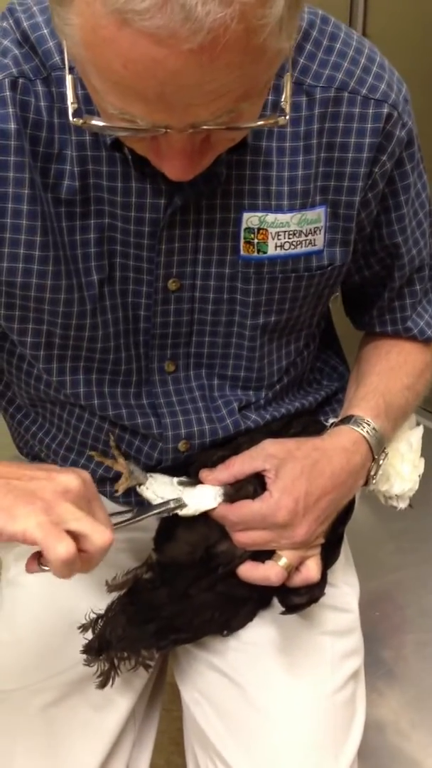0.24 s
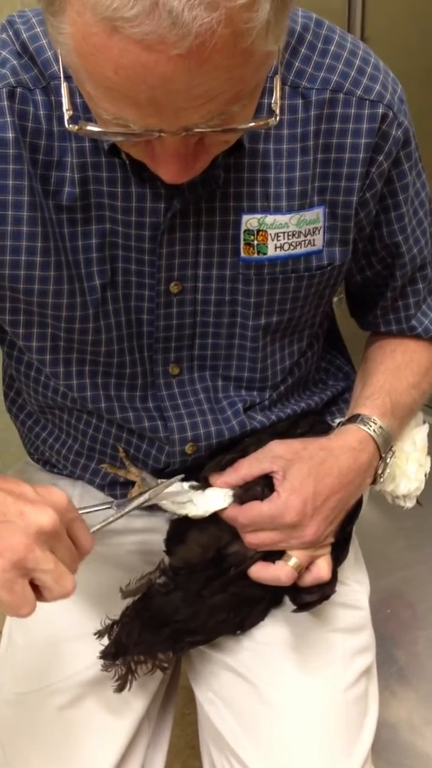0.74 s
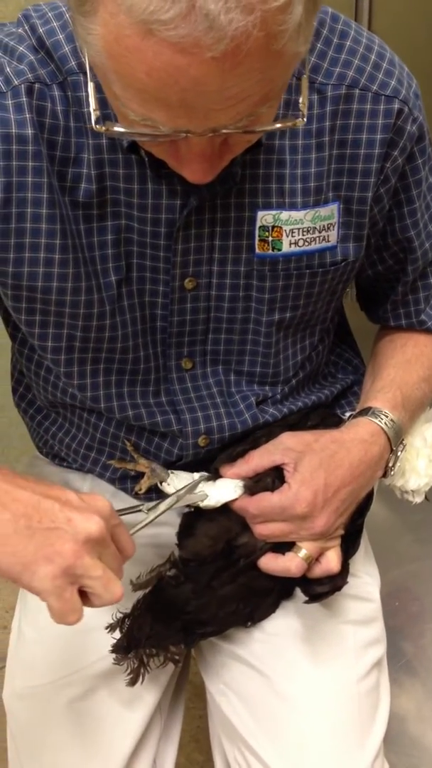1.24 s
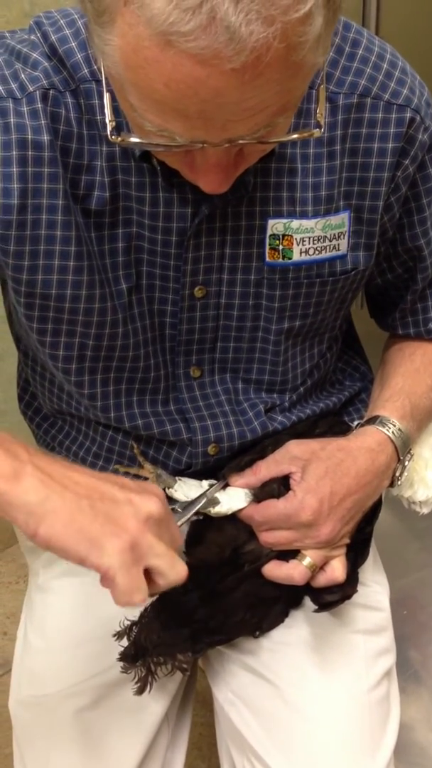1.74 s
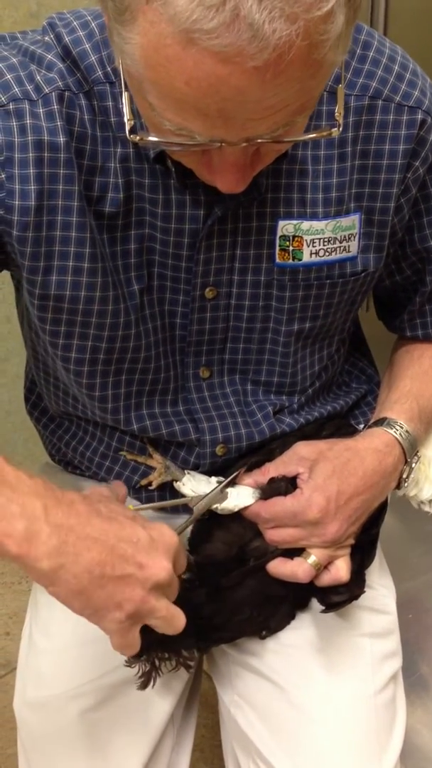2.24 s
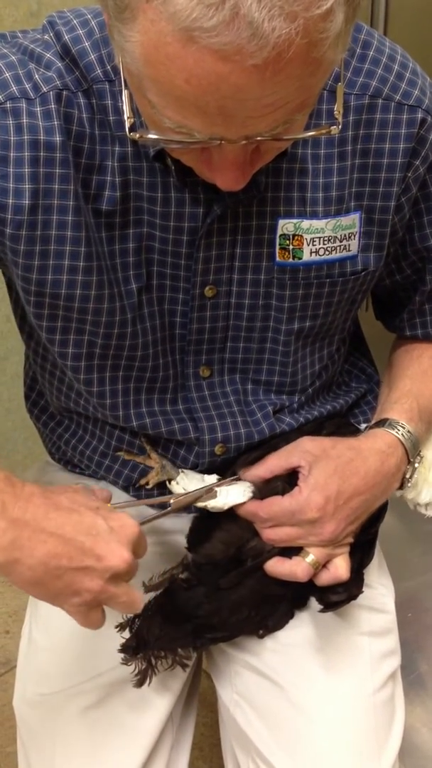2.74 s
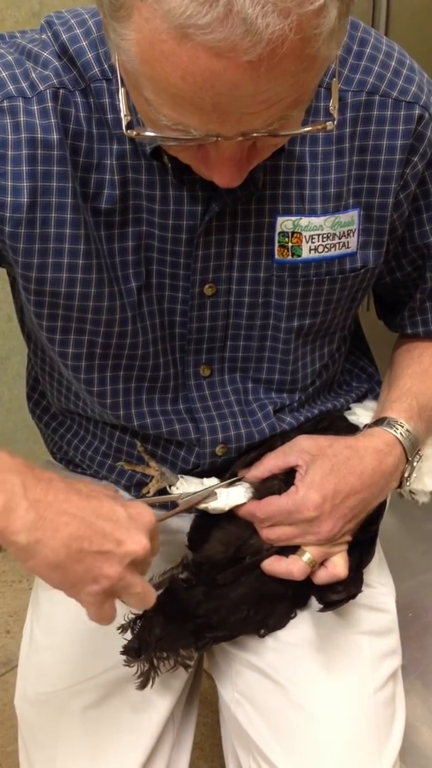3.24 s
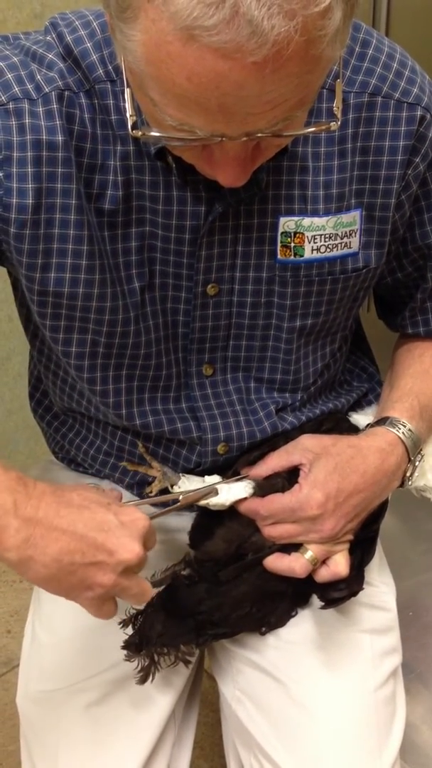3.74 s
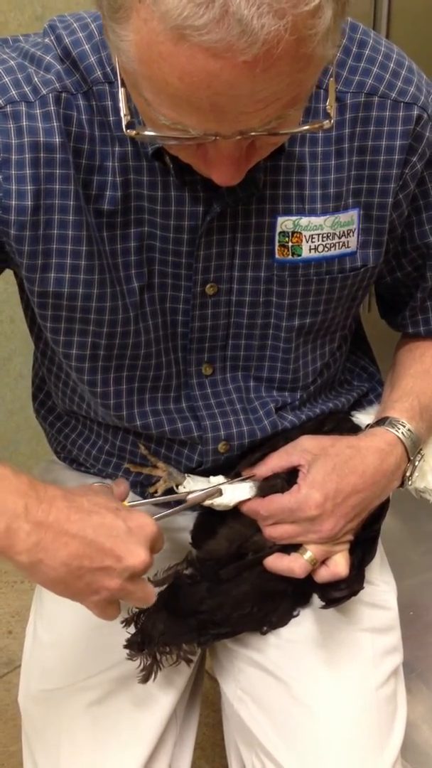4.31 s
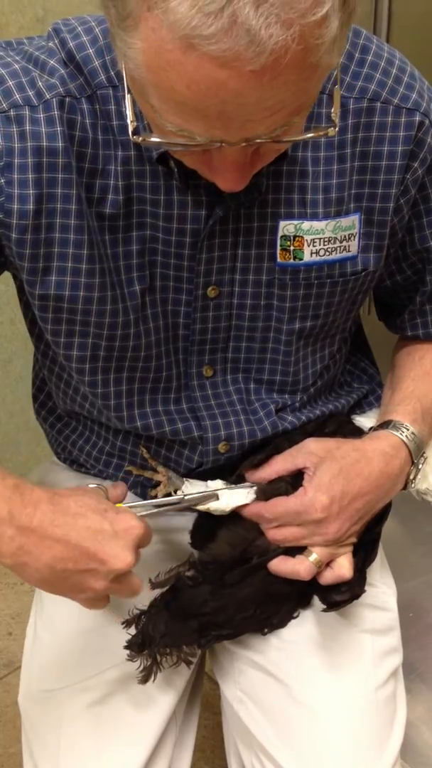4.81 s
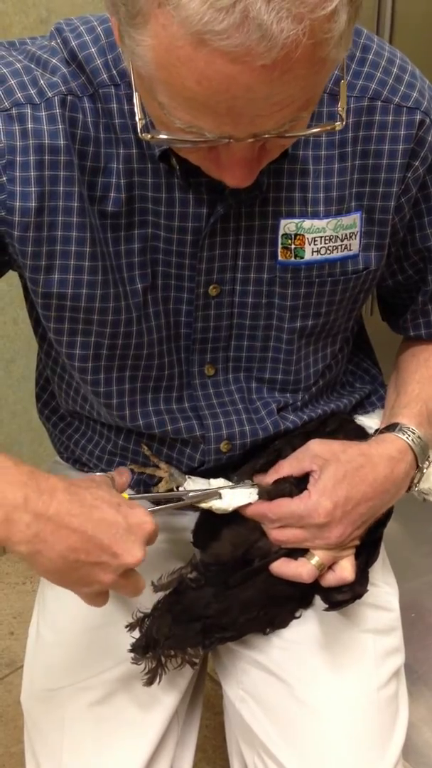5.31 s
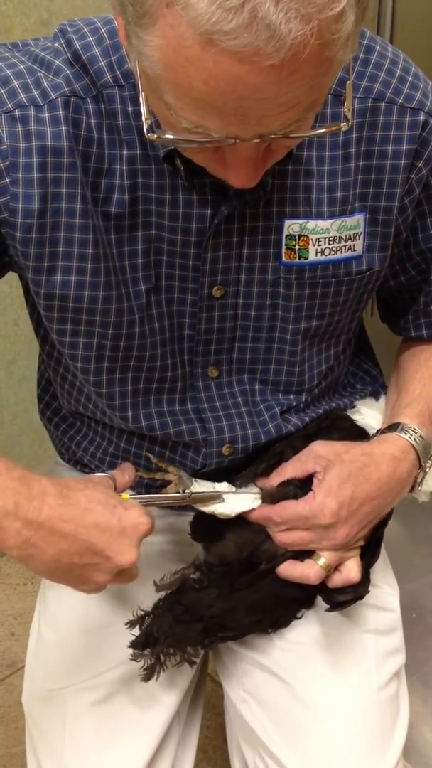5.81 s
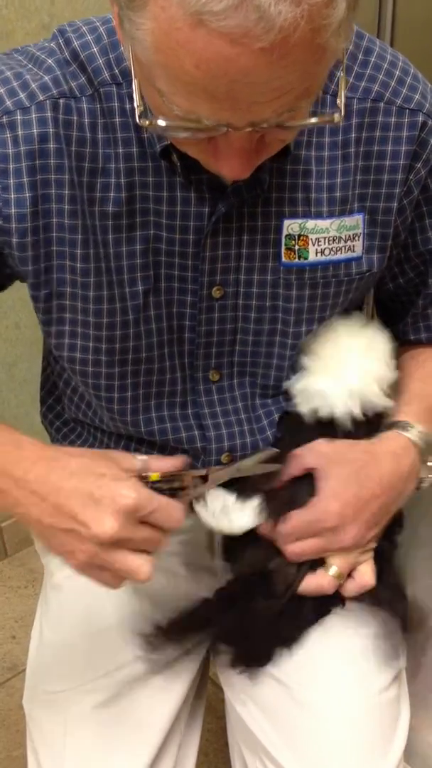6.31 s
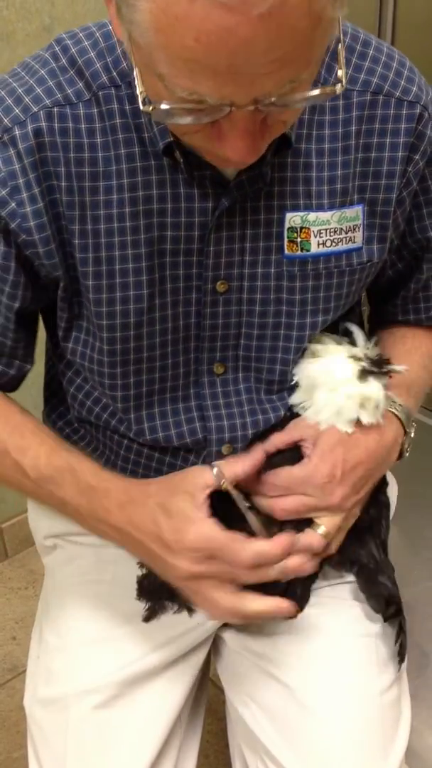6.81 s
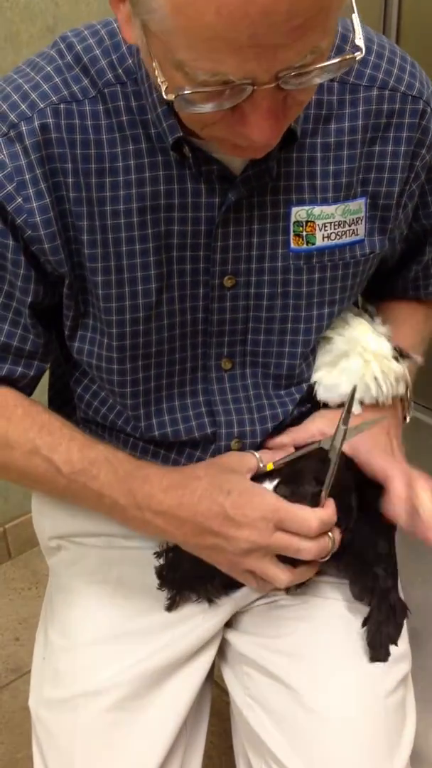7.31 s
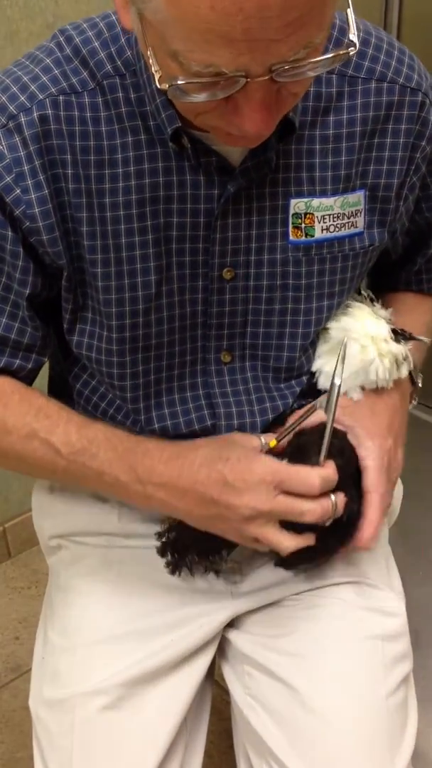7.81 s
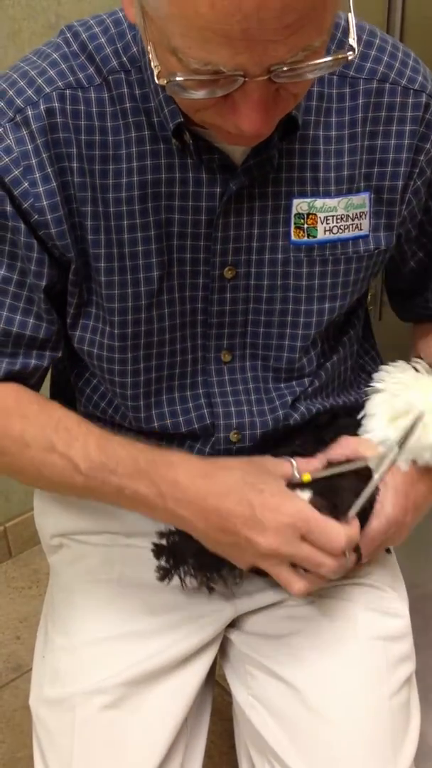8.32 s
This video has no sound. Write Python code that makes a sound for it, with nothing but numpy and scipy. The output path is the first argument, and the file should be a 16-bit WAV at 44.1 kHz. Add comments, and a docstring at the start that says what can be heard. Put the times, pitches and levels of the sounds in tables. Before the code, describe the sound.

A faint ventilation hum runs throughout in a small, hard-walled room that rings briefly. The sound opens on the tail of a nearby hen's squawk. Seven more follow, at about 0.6, 2, 2.9, 3.7, 4.5, 5.3 and 5.9 seconds, the later ones loudest. Each starts as a faint whine, swells into a wheezy hiss and breaks into a short, harsh cry that rises and falls with a shrill edge; most end in a low grunt. Scissors give light, bright ticks now and then, around 1.9, 4.8, 5.7, 6.6 and 7.2 seconds. From about 6.1 seconds feathers rustle softly, and the hen lets out a rough, rising growl, followed by a loud cluck at 6.6 seconds. A few quieter, hollow clucks come at around 6.8, 7.3 and 8.2 seconds as the rustle fades, ending at about 8.5 seconds.

```python
"""Ventilation hums in a small, hard-walled room where a hen, held on a lap, is having her feathers trimmed.
We come in on the end of a squawk, and seven more follow while the scissors tick now and then.
Each starts as a faint whine, swells into a wheezy hiss in her tight throat and breaks into a harsh,
arching cry from the syrinx; most run out of air in a low grunt. After six seconds feathers rustle
under the hands, she growls as she struggles, and she ends on a few hollow clucks."""
import sys
import numpy as np
from scipy import signal
from scipy.fft import rfft, irfft
from scipy.io import wavfile
from scipy.ndimage import uniform_filter1d

SR = 44100
rng = np.random.default_rng(int(sys.argv[2]) if len(sys.argv) > 2 else 0)


def persist_wave(psi):
    """Save psi, clipped to +-1, as 16-bit WAV."""
    counts = np.round(np.clip(psi, -1, 1) * 32767).astype(np.int16)
    wavfile.write(sys.argv[1], SR, np.atleast_2d(counts).T)


N = 377083


def amp(db):
    """Decibels to gain."""
    return 10 ** (np.asarray(db) / 20)


def unit(x):
    """Scales to rms 1."""
    return x / np.sqrt(np.mean(x ** 2) + 1e-20)


def read(points, hz):
    """Reads a curve on a log-frequency axis."""
    f, value = np.transpose(points)
    return np.interp(np.log(hz + 1), np.log(f), value)


def controls(rows):
    """Joins timed breakpoints by straight lines: one curve a column, one value a sample."""
    s, *columns = np.transpose(rows)
    t = np.arange(s[0], s[-1], 1 / SR)
    return [np.interp(t, s, column) for column in columns]


def add(mix, s, sound):
    """Mixes a sound in at time s; it may begin before zero."""
    at = round(s * SR)
    sound, part = sound[max(-at, 0):], mix[max(at, 0):]
    part[:len(sound)] += sound[:len(part)]


def noise(spectrum, size):
    """Noise of rms about 1 with the given spectrum."""
    white = rng.standard_normal(max(size, SR))
    gain = amp(read(spectrum, np.fft.rfftfreq(len(white), 1 / SR)))
    return unit(irfft(rfft(white) * gain, len(white)))[:size]


def wander(hz, size):
    """Smooth random drift of rms about 1, rolled off above hz."""
    white = rng.standard_normal(max(size, SR) + SR)
    return unit(signal.sosfilt(signal.butter(2, hz, fs=SR, output="sos"), white))[SR:][:size]


def fade(size, edge_s=0.0086):
    """Soft ends: the airflow takes a moment to start and stop."""
    return signal.windows.tukey(size, min(1, 2 * edge_s * SR / size))


# The colour of the moving air. Each row: frequency in Hz, relative level in dB.
AIR_SPECTRUM = [(18, -88), (30, -23), (85, -26.5), (110, -17.5), (132, -7), (147, -9.5), (222, -8),
                (253, -8.5), (374, -12), (552, -20.5), (774, -20.5), (837, -19), (1480, -23.5),
                (3150, -31.5), (15000, -39.5)]
# The fan's hum. Each row: pitch in Hz, level in dB.
FAN_TONES = [(120, -69), (178, -71), (233, -64)]


def ventilation(air_db=-57, waver=0.36):
    """The bed: a steady rush of air with a few wavering fan tones."""
    t = np.arange(N) / SR
    hum = np.zeros(N)
    for hz, db in FAN_TONES:
        level = amp(db) * np.sqrt(2) * (1 + waver * wander(9.2, N))
        hum += level * np.sin(2 * np.pi * hz * t + 2 * wander(2.5, N))
    return amp(air_db) * noise(AIR_SPECTRUM, N) + hum


def throat(x, resonances, opening, tilt_db, base_db):
    """Resonances over a flat base, all tilted per octave, at even loudness; opening scales their pitch."""
    hz, t, spectrum = signal.stft(x, SR, nperseg=512, noverlap=384)
    hz = hz[:, None]
    opening, tilt_db, base_db = (np.interp(t * SR, np.arange(len(x)), curve * np.ones(len(x)))
                                 for curve in (opening, tilt_db, base_db))
    peaks = sum(amp(db) / (1 + (2 * (hz - f * opening) / width) ** 2) for f, width, db in resonances)
    tilt = amp(tilt_db * np.log2(np.clip(hz, 500, 5000) / 1500))
    gain = (amp(base_db) + peaks / 2) * tilt
    shaped = signal.istft(spectrum * gain, SR, nperseg=512, noverlap=384)[1][:len(x)]
    return shaped / np.sqrt(uniform_filter1d(shaped ** 2, size=700) + 1e-12)


# Throat and beak in grunts, growls and clucks. Each row: resonance in Hz, width in Hz, height in dB.
THROAT_RESONANCES = [(970, 306, 16.5), (2350, 370, 10.5), (3267, 430, 13), (4500, 580, -15.5),
                     (7600, 640, 6)]


def cry(db, hz, rough, bright_db, opening, tone, rasp, jitter, flutter_db, rasp_db,
        resonances=THROAT_RESONANCES, stagger=0):
    """The syrinx beats out harmonics; as it turns rough its pitch shakes and it chops the air into puffs."""
    size, rough = len(db), np.clip(rough, .02, .99)
    cycles = np.cumsum(hz * (1 + jitter * rough * wander(227, size))) / SR
    cycles += stagger * wander(220, size)  # each beat comes early or late by a share of a period
    harmonics = unit(sum(amp(read(tone, k * hz)) * np.cos(2 * np.pi * (k * cycles + rng.random()))
                         for k in range(1, 24)))
    puffs = unit(noise(rasp, size) * (3.5 + np.exp(-(cycles % 1) / 0.79)))
    drive = np.sqrt(1 - rough ** 2) * (1 - rough / 2) * harmonics + amp(rasp_db) * rough * puffs
    flutter = unit(amp(flutter_db * rough * wander(84, size)))  # the membranes catch and slip
    voice = amp(db) * flutter * fade(size) * throat(drive, resonances, opening, bright_db, base_db=0)
    low_cut = signal.butter(2, 260, "highpass", fs=SR, output="sos")  # a small beak radiates no bass
    return signal.sosfilt(low_cut, voice)


def effort(rise_s, fall_s):
    """One push of air: time from its peak, and the distance from it (0-1) while rising and falling."""
    t = np.arange(-rise_s, fall_s, 1 / SR)
    return t, np.clip(-t / rise_s, 0, 1), np.clip(t / fall_s, 0, 1)


# The squawk's harmonics and its breathy rasp. Each row: frequency in Hz, relative level in dB.
SQUAWK_TONE = [(400, 15.5), (600, 8.5), (710, 4.5), (1050, -6.5), (1350, 1.5), (2000, -0.5), (2800, -4.5),
               (4200, -9), (6000, -22), (12000, -23.5), (15000, -35)]
SQUAWK_RASP = [(150, -42), (380, -45), (540, 9.5), (780, -4), (1200, -7), (1650, -3.5), (2100, 1),
               (2900, 0), (3800, -5), (4700, -8.5), (6400, -20), (8000, -16), (10000, -25), (13000, -30),
               (15500, -52)]
# Throat and beak in full cry. Each row: resonance in Hz, width in Hz, height in dB.
SQUAWK_RESONANCES = [(1060, 354, 16.9), (2326, 410, 10.1), (4380, 490, 2), (7400, 400, 7.1)]
# The big protests. Each row: peak time, rise and fall in seconds, level in dB, top pitch in Hz,
# roughness from 0 to 1, brightness in dB per octave, beak opening as a factor on the resonances,
# shrill ring in Hz, its height in dB.
SQUAWKS = [ (-.03, .06, 0.077, -33.5, 625.7, 0.37, 0.5, 1.06, 3440, 6),
           (.637, .051, 0.037, -25.5, 579, 0.49, 2, 0.98, 3250, 12.5),
           (2.03, 0.057, 0.056, -21, 620, 0.58, 2.5, 1.01, 3150, 5.5),
           (2.886, .052, 0.048, -20.5, 622.8, 0.44, 4, 1.015, 3170, 9),
           (3.657, 0.05, 0.06, -19, 672, 0.18, 2.5, 1.074, 3760, 14),
           (4.522, .056, 0.059, -19, 659.4, 0.45, 3, 1.078, 3420, 6),
           (5.306, 0.066, 0.091, -19.5, 693.7, 0.07, 4, 1.06, 3750, 15),
           (5.922, 0.063, 0.07, -19.5, 702.7, 0.15, 3.5, 1.07, 3650, -2), ]


def squawk(rise_s, fall_s, db, top_hz, rough, bright_db, opening, ring_hz, ring_db):
    """Level and pitch arch with the effort; it starts hoarse, then breaks and dulls as the beak closes."""
    t, early, late = effort(rise_s, fall_s)
    level_db = db - 24.5 * (early ** 2.04 + late ** 1.63)
    arch = 1 - 0.26 * (1 - np.exp(-abs(t / 0.043) ** 2.805))
    pitch = top_hz * arch * (1 - 0.904 * t)  # sags as the air runs out
    rough = rough + (0.64 - rough) * early ** 1.42 + (0.12 - rough) * late ** 2
    bright_db = bright_db - 3 * late ** 0.46
    resonances = SQUAWK_RESONANCES + [(ring_hz / opening, 124, ring_db)]
    beak = opening * (1 - 0.049 * early ** 2 - 0.08 * late ** 2)
    return cry(level_db, pitch, rough, bright_db, beak, SQUAWK_TONE, SQUAWK_RASP, jitter=0.044,
               flutter_db=5.5, rasp_db=4.5, resonances=resonances, stagger=0.011 * (1 + 2 * late))


# How long the hard walls ring. Each row: frequency in Hz, seconds to fall by 60 dB.
ROOM_T60 = [(150, 0.59), (550, 0.8), (800, 0.9), (1130, 0.91), (1350, 0.77), (1700, 0.7), (2500, 0.52),
            (3450, 0.63), (4500, 0.6), (8000, 0.43), (14000, 0.29)]
# The colour of the reverb. Each row: frequency in Hz, relative level in dB.
ROOM_COLOUR = [(300, 1), (560, -2.5), (710, -0.5), (850, 0), (1130, 1.5), (1350, 3), (1700, 0), (2500, 1),
               (3450, 1), (6000, -0.5), (14000, -1)]


def room_tail(bass_build_s=0.0028, treble_build_s=0.013):
    """The dense reverb of the room; its treble builds up more slowly and dies first."""
    hz, t, spectrum = signal.stft(rng.choice([-1., 1.], SR), SR, nperseg=256)
    build_s = np.interp(hz, [1000, 3000], [bass_build_s, treble_build_s])[:, None]
    decay = amp(read(ROOM_COLOUR, hz)[:, None] - 60 * t / read(ROOM_T60, hz)[:, None])
    tail = signal.istft(spectrum * decay * (1 - np.exp(-t / build_s)), SR, nperseg=256)[1]
    return tail / np.linalg.norm(tail)


# Early reflections. Each row: delay in seconds, gain against the direct sound.
REFLECTIONS = [(.0015, 0.12), (.0046, 0.27), (.01, 0.7), (0.016, 0.24), (.068, 0.19)]


def room(x, tail, wet_db):
    """Direct sound, a few early reflections and the tail."""
    response = amp(wet_db) * tail
    response[0] += 1
    for delay_s, gain in REFLECTIONS:
        response[round(delay_s * SR)] += gain
    return signal.fftconvolve(x, response / np.linalg.norm(response[:SR // 25]))


# The breath behind whines and hisses. Each row: frequency in Hz, relative level in dB.
BREATH_SPECTRUM = [(200, -19), (500, -2.5), (900, -9.5), (1600, 0.5), (2600, 9), (4500, 0), (6300, -12),
                   (8200, -11), (11000, -21), (15000, -26)]
# The tight, wheezing throat. Each row: resonance in Hz, width in Hz, height in dB.
WHEEZE_RESONANCES = [(1026, 145, 29.8), (2540, 270, 9.2), (3630, 82, 2.8), (4860, 120, 0.92),
                     (8400, 200, 2)]
# Faint lead-ins to the hisses. Each row: start and length in seconds, level in dB, widest beak opening.
WHINES = [(.432, 0.049, -52.5, 0.86), (1.816, 0.043, -59, 0.9), (2.638, 0.059, -53.5, 0.89),
          (3.38, 0.087, -51.5, 0.95), (4.237, 0.11, -53.5, 0.98), (5.022, 0.038, -49, 0.85),
          (5.666, 0.043, -42, 0.79)]


def whine(length, db, opening, arch=0.18, crest=0.63, flutter_db=3):
    """A hoarse, airy note: the throat's resonances rise, then sink a little."""
    size = round(length * SR)
    progress = np.linspace(0, 1, size)
    opening = opening * (1 - arch * ((progress - crest) / crest) ** 2)
    air = throat(noise(BREATH_SPECTRUM, size), WHEEZE_RESONANCES, opening, tilt_db=-4, base_db=-6)
    return amp(db + flutter_db * wander(120, size)) * signal.windows.tukey(size, .6) * air


# The bright colour of steel blades. Each row: frequency in Hz, relative level in dB.
STEEL_SPECTRUM = [(500, -25), (2000, -38), (4000, -6), (6500, -2), (9000, 1), (12000, -4), (15500, 1.5)]
# Scissor ticks. Each row: start in seconds, level in dB.
SNIPS = [(.447, -58), (1.92, -50), (1.936, -49), (2.647, -66), (4.82, -48.5), (4.849, -55), (5.043, -52),
         (5.718, -46), (6.553, -44), (6.655, -49), (7.178, -39), (7.229, -49)]


def snip(db, decay_s=0.0048):
    """The blades close with a short, bright tick."""
    t = np.arange(SR // 20) / SR
    return amp(db) * noise(STEEL_SPECTRUM, len(t)) * np.exp(-t / decay_s)


# The snap of wet ticks and membrane claps. Each row: frequency in Hz, relative level in dB.
SNAP_SPECTRUM = [(1500, -41), (3300, 2), (5500, 3.5), (6700, -11), (8200, -3.5), (10000, -8), (13000, -9),
                 (15500, -17)]


def crackle(size, ticks_per_s=100, decay_s=0.001):
    """Sparse wet ticks in the tight airway."""
    ticks = (rng.random(size) < ticks_per_s / SR) * rng.uniform(0.33, 1, size)
    t = np.arange(SR // 200) / SR
    return signal.fftconvolve(ticks, noise(SNAP_SPECTRUM, len(t)) * np.exp(-t / decay_s))[:size]


# Swells into the squawks. Each row: start and length in seconds, level it swells toward in dB, broad
# rush beside the resonances in dB, final beak opening, first push in dB (below 0 it creeps in).
HISSES = [(0.494, 0.1, -50, 8, 0.86, 2), (1.901, 0.042, -44, 4, 0.87, 4.5),
          (1.935, 0.059, -50, -2, 1.6, -6), (2.641, 0.016, -49, -4, 0.87, 4.5),
          (2.701, 0.17, -34, 7, 0.89, -7), (3.469, 0.11, -48, 16, 1.25, 1),
          (3.553, 0.092, -31, 5, 0.99, 0.5), (4.365, 0.13, -31.5, 0.5, 0.97, 6),
          (5.028, 0.22, -32.5, -1, 0.96, -2), (5.68, 0.26, -27, -8.5, 1.03, -2)]


def hiss(length, db, breadth_db, opening, push_db, swell_db_per_s=86, rattle_db=4, rattle_hz=44):
    """Air forced through the tight throat rattles and whistles, louder and higher as the beak opens."""
    left_s = np.arange(length, 0, -1 / SR)
    size = len(left_s)
    push = np.exp((left_s - length) / 0.034)
    opening = opening - 0.24 * left_s + 0.029 * wander(26, size)  # the throat trembles as it opens
    rattle_cycles = np.cumsum(rattle_hz * (1 + 0.41 * wander(42, size))) / SR
    rattle = rattle_db * np.cos(2 * np.pi * rattle_cycles)
    rush_db = breadth_db + rattle - 4.5 * push  # starts narrow; the broad rush joins after the push
    air = throat(noise(BREATH_SPECTRUM, size), WHEEZE_RESONANCES, opening, tilt_db=0, base_db=rush_db)
    air += amp(-1) * crackle(size)
    swell_db = db - swell_db_per_s * left_s + push_db * push
    flutter_db = 0.17 * rattle + 2 * wander(360, size)
    return amp(swell_db + flutter_db) * fade(size, edge_s=0.0083) * air


# Thin gliding tones around the calls: airway whistles, and two brief wall echoes of a squawk's upper
# ring (3.70 s, 5.36 s). Each row: start and length in seconds, start pitch in Hz, level in dB.
THIN_TONES = [(0.536, 0.1, 3350, -48.5), (0.583, 0.068, 2356, -33.5), (0.616, 0.033, 3450, -31.5),
              (0.711, 0.046, 4330, -50), (.715, 0.054, 3440, -48.5), (1.901, 0.04, 2285, -40),
              (1.879, 0.045, 3230, -53.5), (1.94, 0.14, 3300, -43.5), (2.003, 0.014, 3310, -31.5),
              (2.709, 0.081, 2297, -44.5), (2.777, 0.084, 2282, -38.5), (2.781, 0.064, 3310, -50),
              (3.704, .034, 2650, -30), (4.502, 0.014, 3296, -25), (5.17, .1, 2570, -42),
              (5.362, 0.024, 2780, -29), (5.879, 0.0376, 2516, -30), (7.28, 0.027, 3890, -43.5),
              (7.283, 0.036, 4320, -48), (7.284, 0.075, 2508, -43.5), (7.375, 0.0087, 1183, -30.5),
              (8.136, 0.018, 1676, -49.5), (8.239, 0.034, 1659, -38), (8.243, 0.016, 2610, -39.5),
              (8.3, 0.018, 2550, -43.5)]
TONE_SAG_HZ_PER_S = 1190


def thin_tone(length, start_hz, end_hz, db, waver=0.022, flutter_db=3):
    """One unsteady, gliding line; waver is the share by which its pitch trembles."""
    size = round(max(length, .01) * SR)
    hz = np.linspace(start_hz, end_hz, size) * (1 + waver * wander(195, size))
    swell = signal.windows.tukey(size, .5) * amp(db + flutter_db * wander(204, size))
    return np.sqrt(2) * swell * np.sin(2 * np.pi * np.cumsum(hz) / SR)


# The windpipe's high modes. Each row: resonance in Hz, width in Hz, height in dB.
WINDPIPE_RESONANCES = [(5780, 220, 4.5), (6130, 280, 21), (7700, 300, 18.4), (8360, 280, 17),
                       (10660, 440, 12.3), (12200, 480, 9)]
# The piercing edge on the squawks. Each row: start and length in seconds, level in dB, beak opening.
CLAP_BURSTS = [(0.616, .033, -39, 0.96), (2.002, 0.04, -38.5, 1.09), (2.863, 0.032, -35, 0.97),
               (3.641, 0.06, -37.5, 1.05), (4.501, .034, -35, 1.01), (5.284, .056, -34, 1.04),
               (5.898, 0.027, -46, 1.04)]


def claps(length, db, opening, claps_per_s=300, uneven_db=5):
    """At full effort the membranes clap together at uneven moments and ring the windpipe."""
    size = round(length * SR)
    cycles = np.cumsum(claps_per_s * np.exp(.4 * wander(200, size))) / SR
    cracks = noise(SNAP_SPECTRUM, size) * np.exp(-(cycles % 1) / 0.27)
    cracks *= amp(uneven_db * wander(190, size))
    ringing = throat(cracks, WINDPIPE_RESONANCES, opening, tilt_db=0, base_db=0)
    return amp(db) * fade(size, edge_s=.005) * ringing


# The grunt's dark harmonics, and the rasp it shares with the clucks.
# Each row: frequency in Hz, relative level in dB.
GRUNT_TONE = [(300, 9), (520, 4.5), (800, -2.5), (1100, -2.5), (1700, -16.5), (2400, -66), (4500, -26),
              (12000, -43)]
SHORT_CALL_RASP = [(150, -34), (350, -58), (520, 3.5), (800, -11), (1300, -9), (1700, 0.5), (2500, -10.5),
                   (3200, -9), (4200, -9), (5500, -36), (9000, -30), (15000, -41)]
# The tail ends of squawks. Each row: peak time, rise and fall in seconds, level in dB, peak's pitch in Hz.
GRUNTS = [(0.696, .02, 0.038, -30, 545.8), (2.105, 0.015, 0.047, -31.5, 510), (2.14, .015, 0.12, -45, 359),
          (2.957, 0.029, 0.011, -29, 489.6), (3.735, 0.016, 0.17, -47.5, 352.5),
          (4.598, .022, 0.0114, -30.5, 545.6), (5.386, 0.03, 0.018, -27, 560.4)]


def grunt(rise_s, fall_s, db, hz, floor_hz=275, sag_s=0.0893):
    """The last of the air: a short low note whose pitch sinks."""
    t, early, late = effort(rise_s, fall_s)
    level_db = db - 16.5 * (early ** 2 + late)
    pitch = floor_hz + (hz - floor_hz) * np.exp(-t / sag_s)
    return cry(level_db, pitch, rough=0.26, bright_db=1, opening=0.9, tone=GRUNT_TONE,
               rasp=SHORT_CALL_RASP, jitter=0.13, flutter_db=9, rasp_db=-11.5)


# The squeak's first four harmonics, each a relative level in dB.
SQUEAK_PARTIALS_DB = [-8, -0.5, -6.5, -17]
# Squeaks inside the whines. Each row: start and length in seconds, level in dB, start and end pitch in Hz.
SQUEAKS = [(1.831, 0.029, -52, 920, 1083), (3.427, 0.04, -51.5, 1022, 1203),
           (4.281, 0.0395, -49, 999, 1168)]


def squeak(length, db, start_hz, end_hz):
    """The airway catches for a moment and sounds a thin, rising note."""
    return sum(thin_tone(length, k * start_hz, k * end_hz, db + partial_db, waver=0.005, flutter_db=1.5)
               for k, partial_db in enumerate(SQUEAK_PARTIALS_DB, 1))


# The soft colour of feathers and cloth. Each row: frequency in Hz, relative level in dB.
FEATHER_SPECTRUM = [(80, -28), (300, 16.5), (1000, 8), (3000, 10.5), (7000, 4), (10000, 2.5), (15000, -2)]
# The fader ride on the rustle. Each row: time in seconds, level in dB.
RUSTLE_CURVE = [(6.101, -65.5), (6.299, -50), (6.7, -62.5), (6.899, -67.5), (7.1, -66.5), (7.251, -61.5),
                (7.599, -70), (7.701, -54), (7.759, -78), (7.85, -68.5), (8.502, -78)]


def rustle(grain_db=5):
    """Feathers slide under the hands in small clumps of grains."""
    db, = controls(RUSTLE_CURVE)
    return amp(db) * unit(noise(FEATHER_SPECTRUM, len(db)) * amp(grain_db * wander(300, len(db))))


# The growl's harmonics and its rasp. Each row: frequency in Hz, relative level in dB.
GROWL_TONE = [(380, 4), (570, 7.5), (900, 3), (1150, 4.5), (1700, 3.5), (2300, -7), (3400, -17),
              (5200, -48), (12000, -46)]
GROWL_RASP = [(150, -35), (330, -80), (500, 8.5), (850, -0.5), (1300, -1.5), (1850, 3), (2400, -3),
              (3200, -11.5), (4300, -10), (5500, -30), (9000, -35), (15000, -52)]
# The struggle: a growl, then a loud cluck in the same voice. Each row: time in seconds, level in dB,
# pitch in Hz, roughness from 0 to 1, brightness in dB per octave.
GROWL_CURVE = [(6.198, -39.5, 387.6, 0.4, -10.5), (6.225, -31, 439, 0.34, -1.5), (6.245, -28, 504, 0.44, 2),
               (6.3, -28.5, 522.5, 0.64, 3), (6.352, -23.5, 564.6, 0.25, 6.5),
               (6.385, -24.5, 578.2, 0.26, 4.5), (6.42, -28, 607.6, 0.28, 1),
               (6.455, -29.5, 595.5, 0.23, 0.5), (6.48, -36, 563, 0.14, -4)]
LOUD_CLUCK_CURVE = [(6.533, -29.5, 484, 0.43, -7), (6.55, -27, 526.7, 0.28, -9),
                    (6.562, -29.5, 523.5, 0.48, -6), (6.579, -27, 547, 0.37, -6.5),
                    (6.6, -29.5, 517, 0.52, -7), (6.618, -36, 490, 0.63, -7)]


def growl(curve, opening):
    """A throaty note that breaks up and clears again as she strains."""
    db, hz, rough, bright_db = controls(curve)
    return cry(db, hz, rough, bright_db, opening, GROWL_TONE, GROWL_RASP,
               jitter=0.0866, flutter_db=2, rasp_db=9)


# The cluck's hollow harmonics. Each row: frequency in Hz, relative level in dB.
CLUCK_TONE = [(380, 10), (550, 4.5), (1100, -16.5), (1600, -4.5), (1950, -12), (2450, -24), (3200, -33),
              (4000, -19), (5200, -21.5), (9000, -17.5), (12000, -31)]
# The closing clucks. Each row: peak time, rise and fall in seconds, level in dB, pitch in Hz,
# glide in Hz per second, roughness from 0 to 1, brightness in dB per octave, beak opening.
CLUCKS = [ (6.818, 0.012, 0.0056, -34.5, 488, -15, 0.84, -5, 0.99),
          (6.853, 0.007, 0.0082, -32, 517, -1000, 0.86, -4.5, 1),
          (7.303, 0.027, 0.025, -30.5, 528.6, 2502, 0.4, 0, 0.81),
          (7.38, .02, 0.024, -28.5, 561.6, 901, 0.45, -0.5, 0.72),
          (7.428, 0.032, 0.036, -39, 599, -500, 0.8, -7, 1),
          (8.18, 0.041, 0.11, -44, 544, -100, 0.89, 1.5, 0.77),
          (8.25, 0.0087, 0.015, -32, 525, -1400, 0.36, -3, 0.95), ]


def cluck(rise_s, fall_s, db, hz, glide_hz_per_s, rough, bright_db, opening):
    """A brief, hollow note on a straight glide, with the beak nearly shut."""
    t, early, late = effort(rise_s, fall_s)
    level_db = db - 2.5 * (early + late) ** 2
    return cry(level_db, hz + glide_hz_per_s * t, rough, bright_db, opening, CLUCK_TONE, SHORT_CALL_RASP,
               jitter=0.043, flutter_db=5, rasp_db=-4.5)


def scene():
    """Hen, scissors and feathers sound into the room, over the ventilation."""
    mix, tail = ventilation(), room_tail()

    def play(s, sound, wet_db=-2.5):
        add(mix, s, room(sound, tail, wet_db))

    for call, rows, wet_db in (squawk, SQUAWKS, -2.5), (grunt, GRUNTS, -2.5), (cluck, CLUCKS, -2):
        for peak_s, rise_s, *shape in rows:
            play(peak_s - rise_s, call(rise_s, *shape), wet_db)
    for s, *shape in CLAP_BURSTS:
        play(s, claps(*shape), wet_db=-5.5)
    play(GROWL_CURVE[0][0], growl(GROWL_CURVE, opening=0.933), wet_db=-6)
    play(LOUD_CLUCK_CURVE[0][0], growl(LOUD_CLUCK_CURVE, opening=1.11), wet_db=-6)
    for call, rows in (hiss, HISSES), (whine, WHINES), (squeak, SQUEAKS):
        for s, *shape in rows:
            play(s, call(*shape))
    for s, length, hz, db in THIN_TONES:
        play(s, thin_tone(length, hz, hz - TONE_SAG_HZ_PER_S * length, db), wet_db=-7)
    for s, db in SNIPS:
        play(s, snip(db), wet_db=-4)
    play(RUSTLE_CURVE[0][0], rustle(), wet_db=6)
    return mix[None]


def record(dry, low_hz=60, top_hz=15350):
    """The microphone drops the deep bass; a steep high cut takes off the very top."""
    thin = signal.sosfilt(signal.butter(2, low_hz, "highpass", fs=SR, output="sos"), dry)
    high_cut = signal.firwin(511, top_hz, window=("kaiser", 9), fs=SR)
    return signal.oaconvolve(thin, high_cut[None], "same")


dry = scene()
out = record(dry)
persist_wave(out)
```